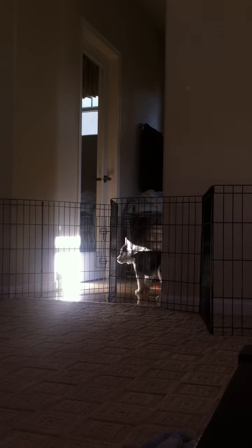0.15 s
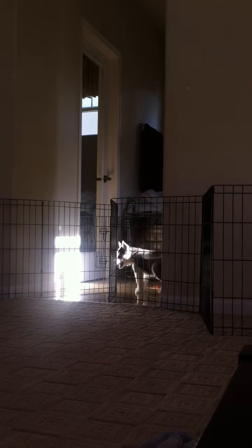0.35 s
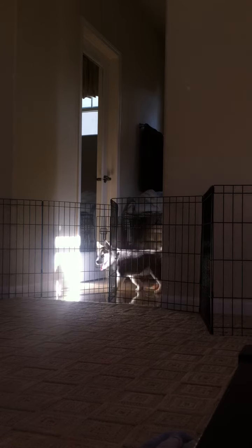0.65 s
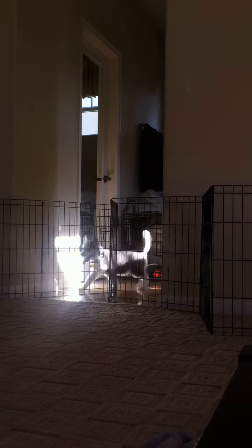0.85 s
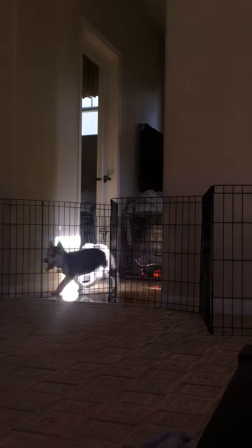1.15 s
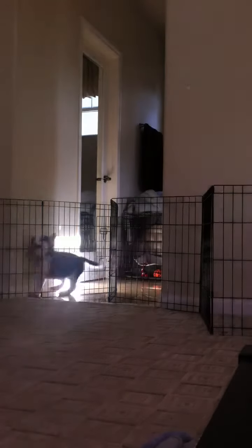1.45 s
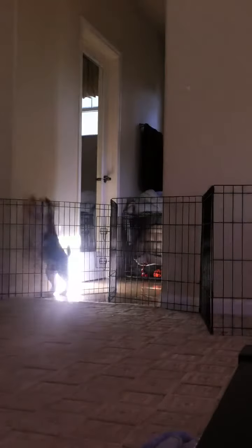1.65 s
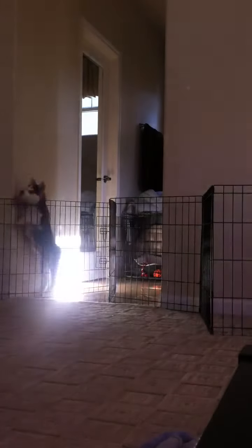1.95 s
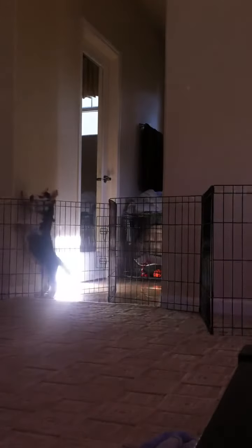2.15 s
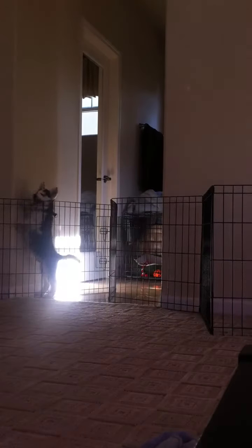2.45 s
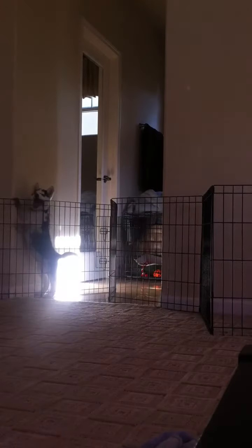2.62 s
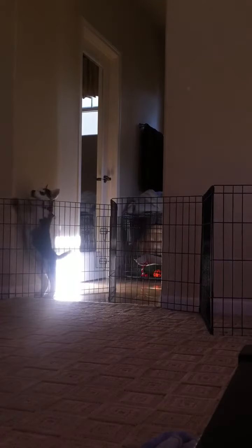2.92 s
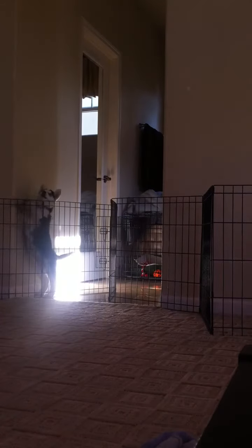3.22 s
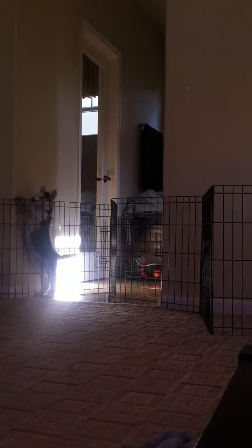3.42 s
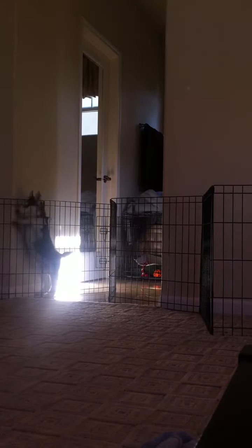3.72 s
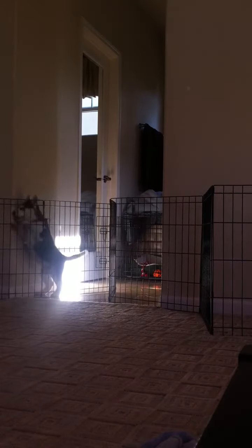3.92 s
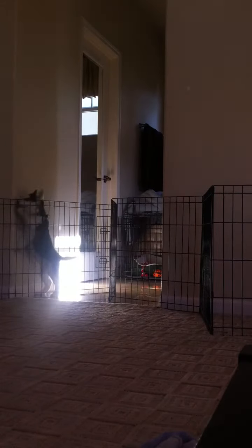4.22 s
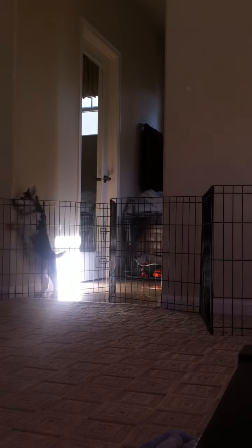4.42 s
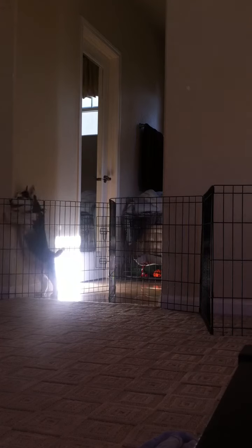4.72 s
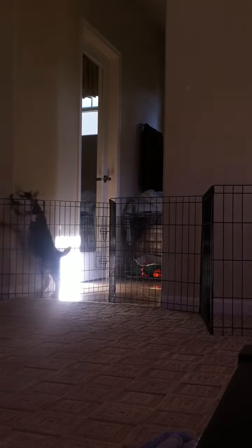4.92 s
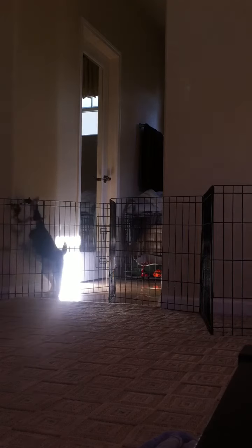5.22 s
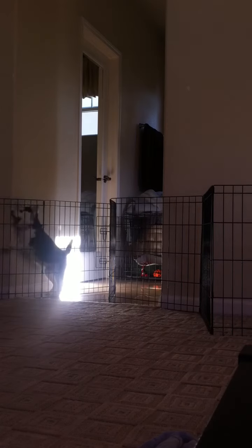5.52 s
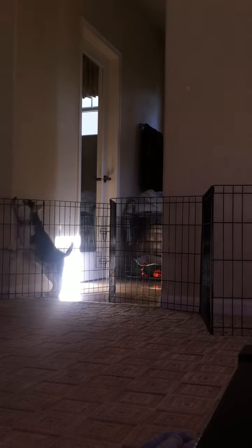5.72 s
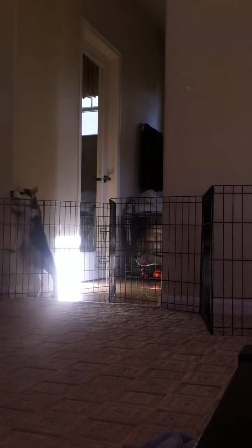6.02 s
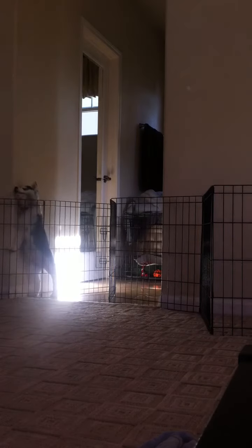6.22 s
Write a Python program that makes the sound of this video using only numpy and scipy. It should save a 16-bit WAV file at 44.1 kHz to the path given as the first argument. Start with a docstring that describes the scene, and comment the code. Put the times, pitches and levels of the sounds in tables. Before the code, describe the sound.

A young dog gives hoarse barks that break into sliding yelps and squeals, while paws thud and claws scrape a pen in an echoing room.

```python
"""Hoarse puppy barks break into high sliding yelps and squeals, with thin nasal whistles on many calls.
Paws thud and claws scrape wire and wall as it jumps up at its pen in a hard, echoing room; a faint hum lies under.
Barks: uneven vocal folds plus a chopped noise jet. Yelps: sliding harmonics plus hiss. Whistles: wavering sines.
Scrapes, thuds and hum: shaped noise. Voice and feet share one room of echoes and diffuse tail."""
import sys
import numpy as np
from scipy import signal
from scipy.fft import rfft, irfft, next_fast_len
from scipy.io import wavfile
from scipy.ndimage import uniform_filter1d, minimum_filter1d

SR = 44100
rng = np.random.default_rng(int(sys.argv[2]) if len(sys.argv) > 2 else 0)


def inscribe(sig):
    """Save sig as 16-bit PCM at rate SR to the path in sys.argv[1].

    A 1-D sig is mono; a 2-D sig holds one channel per row.
    Samples are clipped to [-1, 1] before scaling.
    """
    pcm = np.round(np.clip(np.atleast_2d(sig).T, -1, 1) * 32767)
    wavfile.write(sys.argv[1], SR, pcm.astype(np.int16))


N = 280476  # samples

# Call and foot levels are before VOICE_GAIN_DB, FEET_GAIN_DB and the room.
# Barks. Each row: start in seconds, length in seconds, start pitch in Hz, end pitch in Hz, level in dB,
# roughness (about 0 to 1), mouth resonance in Hz.
BARKS = [(-.03, 0.18, 599.8, 666.3, -18.5, 0.87, 1127), (0.139, 0.076, 637.5, 603.5, -27, 0.31, 1320),
         (.436, 0.12, 441.7, 768, -25.5, 0.61, 1510), (2.636, 0.067, 593, 731, -35.5, 1.06, 1470),
         (2.85, 0.1, 619.6, 708.6, -12.5, 0.59, 1470), (3.374, 0.098, 715.3, 614.6, -30, 0.43, 1110),
         (3.754, 0.097, 424, 594, -38, 0.54, 1180), (4.001, .104, 472, 701, -29.5, 0.46, 1250),
         (4.676, .085, 461, 704, -22, 0.61, 1310), (4.917, .14, 351.2, 742.5, -14, 0.88, 1460),
         (5.619, 0.15, 399.4, 716.7, -15, 0.86, 1164)]
# Drawn-out yelps, one curve each. Each row: time in seconds, pitch in Hz, level in dB, overtone strength in dB.
YELP_CURVES = [
    [(3.06, 1760, -32, -28), (3.09, 1750, -29, -3), (3.115, 1557, -21.5, -0.5), (3.145, 1805, -24, -8.5),
     (3.2, 2208, -32, -4)],
    [(5.085, 1930, -26.5, -23), (5.145, 1570, -25.5, 12), (5.16, 1286, -20, 7.5), (5.204, 1274, -16.5, 8),
     (5.212, 1598, -17.5, 9), (5.24, 1855, -23.5, -6), (5.275, 1930, -23.5, -3), (5.31, 1757, -28, 2),
     (5.318, 1235, -11.5, 1.5), (5.345, 1174, -12.5, -3), (5.385, 1317, -12.5, -7),
     (5.415, 1477, -16.5, -9)],
    [(5.87, 1366, -24.5, -1), (5.92, 1360, -31, 16), (5.94, 1180, -28.5, 7), (5.99, 1159, -16, -8),
     (6.042, 1290, -17.5, -16.5), (6.08, 1159, -17.5, -8), (6.14, 1085, -20, -9.5), (6.18, 1140, -24, 5),
     (6.23, 1115, -23, 1.5), (6.282, 1395, -16.5, -15.5)],
]
# Squeals breaking out of barks and yelps. Each row: start in seconds, length in seconds, pitch in Hz, level in dB.
SQUEALS = [(0.071, 0.107, 1225, -32.5), (2.922, 0.058, 1382, -24), (3.422, 0.0646, 1846, -27.5),
           (3.796, 0.064, 1600, -33), (4.707, 0.032, 1362, -15), (4.999, 0.036, 1406, -14),
           (5.42, 0.0315, 1766, -23), (5.736, 0.043, 1760, -15.5), (6.269, 0.052, 1713, -24)]
# Nasal whistles, mostly as a call ends. Each row: start in seconds, mid pitch in Hz, level in dB.
WHISTLES = [(0.085, 8400, -45.5), (.22, 8800, -53.5), (2.182, 8380, -49.5), (2.961, 8630, -40),
            (3.161, 8630, -38.5), (3.184, 7900, -46), (3.415, 8360, -43), (3.796, 8550, -53.5),
            (4.59, 8300, -58.5), (4.722, 8960, -46), (5.029, 8590, -37), (5.425, 8530, -49.5),
            (5.767, 8740, -40.5), (6.279, 8680, -41)]
# Hardest claw strokes on wire and wall. Each row: start in seconds, length in seconds, level in dB,
# brightness in dB per octave.
SCRAPES = [(1.384, 0.06, -61, 0), (1.677, 0.095, -50, 1), (1.828, 0.055, -49.5, 7), (1.937, 0.11, -58.5, 0),
           (2.09, 0.044, -53, -4), (2.127, 0.16, -50, 7), (2.442, .24, -49.5, -3.5),
           (3.662, 0.047, -56.5, 5), (4.134, 0.1, -57.5, 10.5), (4.292, 0.09, -50, -0.5)]
# Heaviest paw landings on floor and pen. Each row: start in seconds, level in dB, thud pitch in Hz.
PAW_LANDINGS = [(1.76, -44, 253), (1.809, -42, 173), (1.88, -47.5, 286), (2.15, -37.5, 220),
                (2.299, -49.5, 243), (2.438, -41, 186), (2.764, -48.5, 273), (3.285, -45, 205),
                (3.572, -48.5, 340), (4.149, -39.5, 200), (4.215, -44.5, 172), (4.57, -49.5, 500)]
# Throat and muzzle response in barks. Each row: frequency in Hz, gain in dB.
BARK_THROAT = [(150, -31.5), (380, -5), (570, -19), (745, -4.5), (920, -3), (1250, -0.5), (1800, 1.5),
               (2400, -0.5), (2900, -2), (3600, 1), (4500, -3.5), (5800, -34), (9000, -20), (12500, -24),
               (16000, -36.5)]
# Throat and muzzle response in yelps. Each row: frequency in Hz, gain in dB.
YELP_THROAT = [(900, -12.5), (1250, 3.5), (1800, -7.5), (2450, -3.5), (3500, -1.5), (4200, -14),
               (5000, -20.5), (6000, -39), (9500, -41), (15000, -51)]
# Spectrum of scraping claws. Each row: frequency in Hz, relative level in dB per Hz.
CLAW_SPECTRUM = [(30, -28), (200, -0.5), (700, -4.5), (1500, -1), (3000, 2.5), (6000, -1.5), (12000, -5),
                 (16000, -15)]
# Spectrum of the quiet room. Each row: frequency in Hz, relative level in dB per Hz.
HUM_SPECTRUM = [(25, -17.5), (50, -13.5), (80, -11), (125, 2.5), (210, 0.5), (350, -11.5), (700, -11),
                (1500, -17), (3000, -23.5), (6000, -28), (15500, -36.5)]
# Room decay. Each row: frequency in Hz, time to fall 60 dB in seconds.
ROOM_T60 = [(200, 0.22), (1000, 0.45), (3000, 0.51), (8000, 0.5), (15000, 0.19)]
# First echoes from floor and walls. Each row: delay in seconds, level in dB relative to the whole tail.
ECHOES = [(.0013, -9.5), (.0041, -15), (.0073, -10.5), (0.0121, -13), (0.0191, -14.5)]

HUM_DB = -57.5
VOICE_GAIN_DB, FEET_GAIN_DB = 1.0, 2.0
TOP_HZ, PEAK_LIMIT = 15750, 0.72

# a harder bark is brighter
FULL_BARK_DB, FULL_BARK_TILT_DB_PER_OCTAVE, TILT_PER_LEVEL_DB = -15, 0.6, 0.21
BARK_CREST = 0.51  # loudest point, share of length
OPEN_S, MUFFLE_HZ = 0.033, 1390

# the yelping voice roughens as pitch climbs and as air runs out
CLEAN_HZ, CLEAN_DB = 1150, -17
YELP_ROUGH, ROUGH_PER_OCTAVE, ROUGH_PER_LOST_DB = 0.22, 0.4, 0.025

# a squeal slides up to its pitch as it swells, and creeps on upward as it fades
SQUEAL_SCOOP, SQUEAL_CREEP, SQUEAL_CREST = 0.0768, 0.03, 0.447  # shares of pitch, pitch and length
SQUEAL_EDGE_DB, SQUEAL_OVERTONE_DB = -15.5, -15.5

WHISTLE_S, WHISTLE_RISE_HZ = 0.045, 156.5

# light fidgeting against the pen; levels before the random force
FIDGET_START_S, FIDGET_END_S = 2.4, 4.3
STEP_DB, STEP_HZ = -56.5, 260
RAKE_S, RAKE_DB, RAKE_TILT_DB_PER_OCTAVE = 0.17, -68.5, 5


def undb(db):
    """Decibels to gain."""
    return 10 ** (np.asarray(db) / 20)


def unit(x):
    """Scale to rms 1."""
    return x / np.sqrt(np.mean(x ** 2) + 1e-18)


def on_log(hz, points):
    """Read (Hz, value) points on a log-frequency axis."""
    f, value = np.transpose(points)
    return np.interp(np.log(hz + 1), np.log(f), value)


def colour(x, db_at):
    """Filter by a gain in dB that is a function of frequency."""
    size = next_fast_len(len(x) + 2048)
    hz = np.maximum(np.fft.rfftfreq(size, 1 / SR), 1)
    return irfft(rfft(x, size) * undb(db_at(hz)), size)[:len(x)]


def tilt(f, db_per_octave, pivot_hz):
    """A spectral slope, flat below 200 Hz."""
    return db_per_octave * np.log2(np.maximum(f, 200) / pivot_hz)


def wander(count, rate_hz):
    """Random motion: straight lines between normal draws made rate_hz times a second."""
    knots = rng.standard_normal(8192)
    return np.interp(np.arange(count) / SR * rate_hz, np.arange(len(knots)), knots)


def progress(length_s):
    """Run from 0 to 1 over the length, in at least 64 samples."""
    return np.linspace(0, 1, max(int(length_s * SR), 64))


def add(track, start_s, sound):
    """Mix a sound in, trimming whatever falls outside the track."""
    start = int(start_s * SR)
    sound, start = sound[max(-start, 0):], max(start, 0)
    track[start:start + len(sound)] += sound[:max(N - start, 0)]


def room_hum():
    """Low-weighted noise with a slightly unsteady level."""
    noise = unit(colour(rng.standard_normal(N), lambda f: on_log(f, HUM_SPECTRUM)))
    return noise * undb(HUM_DB + 0.73 * wander(N, 18))


def bark(length_s, crest, start_hz, end_hz, rough, mouth_hz, tilt_db, jitter=0.1035, chaos=0.1472,
         shimmer=0.73, upper_db=1, rasp_db=1, rasp_hz=1200, mouth_db=7, mouth_width_hz=130, fall=0.49):
    """One push of air: the pitch slides while the folds beat unevenly and chop a turbulent jet."""
    u = progress(length_s)
    count = len(u)
    crest = np.clip(crest, 0.1, 0.9)
    push = np.sin(np.pi * np.interp(u, [0, crest, 1], [0, 0.5, 1])).clip(0)
    # roughness grows with pressure
    strain = rough * push ** 0.16
    pitch_hz = end_hz + (start_hz - end_hz) * (1 - u) ** 2.2
    phase = 2 * np.pi * np.cumsum(pitch_hz * (1 + jitter * strain * wander(count, 501))) / SR
    # the bulk of the folds swings more steadily than their slapping edges
    swing = np.sin(phase) + np.sin(2 * phase)
    edge_phase = phase + 2 * np.pi * np.cumsum(pitch_hz * chaos * rough * wander(count, 600)) / SR
    slaps = unit(sum(np.sin(k * edge_phase) / k ** fall for k in range(3, 13)))
    slaps *= 1 + shimmer * wander(count, 453.9)

    def jet_db(f):
        return -10 * np.log10((1 + (rasp_hz / f) ** 2) * (1 + (f / 9000) ** 2))

    def mouth_response_db(f):
        resonance_db = mouth_db / (1 + ((f - mouth_hz) / mouth_width_hz) ** 2)
        return on_log(f, BARK_THROAT) + tilt(f, tilt_db, mouth_hz) + resonance_db

    chopped = rng.standard_normal(count) * (1 + 0.28 * np.cos(edge_phase))
    rasp = undb(rasp_db) * strain * unit(colour(chopped, jet_db))
    source = swing + undb(upper_db) * push ** 0.4 * slaps + rasp
    source *= undb(5.4 * wander(count, 222.4))
    voice = colour(source, mouth_response_db)
    # the push sets the slow loudness; only quick flutter survives the levelling
    level = np.sqrt(uniform_filter1d(voice ** 2, size=900) + 1e-12)
    return voice / level * push ** 1.22


def opening(voice):
    """The mouth opens as a bark starts, so the treble arrives late."""
    closed = colour(voice, lambda f: -10 * np.log10(1 + (f / MUFFLE_HZ) ** 4))
    gape = np.minimum(np.arange(len(voice)) / SR / OPEN_S, 1)
    return closed + gape * (voice - closed)


def yelp(curve, jitter=0.025, waver=0.01314, hiss_db=-17, flutter_db=4):
    """Tight folds sing a sliding stack of harmonics; strain makes it shake and hiss."""
    knot_s, *columns = np.transpose(curve)
    t = np.arange(knot_s[0], knot_s[-1], 1 / SR)
    count = len(t)
    hz, db, overtone_db = (np.interp(t, knot_s, column) for column in columns)
    climb = ROUGH_PER_OCTAVE * np.log2(hz / CLEAN_HZ)
    lost_air = ROUGH_PER_LOST_DB * (CLEAN_DB - db)
    rough = np.clip(YELP_ROUGH + climb + lost_air, 0, 1)
    hz = hz * (1 + jitter * rough * wander(count, 600) + waver * wander(count, 111.27))
    phase = 2 * np.pi * np.cumsum(hz) / SR
    # the folds close unevenly, so each overtone flutters
    gains = []
    for k in range(1, 13):
        flutter = overtone_db + flutter_db * wander(count, 141.2)
        gain_db = on_log(k * hz, YELP_THROAT) + flutter * (k > 1)
        gains.append(undb(gain_db) * (k * hz < TOP_HZ))
    tone = sum(g * np.sin(k * phase) for k, g in enumerate(gains, 1))
    tone /= np.sqrt(sum(g ** 2 for g in gains) / 2)
    air = unit(colour(rng.standard_normal(count), lambda f: on_log(f, BARK_THROAT)))
    return (tone + undb(hiss_db) * rough * air) * undb(db) * signal.windows.tukey(count, 0.07)


def squeal_curve(start_s, length_s, hz, db):
    """A brief arch of the yelping voice, with the columns of a yelp curve."""
    crest_s = start_s + length_s * np.clip(SQUEAL_CREST, 0.1, 0.9)
    edge_db = db + SQUEAL_EDGE_DB
    return [(start_s, hz * (1 - SQUEAL_SCOOP), edge_db, SQUEAL_OVERTONE_DB),
            (crest_s, hz, db, SQUEAL_OVERTONE_DB),
            (start_s + length_s, hz * (1 + SQUEAL_CREEP), edge_db, SQUEAL_OVERTONE_DB)]


def whistle(length_s, start_hz, end_hz, waver=0.013, air_db=-12):
    """A thin, unsteady squeak through the nose, with a fringe of hiss."""
    u = progress(length_s)
    hz = (start_hz + (end_hz - start_hz) * u) * (1 + waver * wander(len(u), 250))
    tone = unit(np.sin(2 * np.pi * np.cumsum(hz) / SR))
    air = unit(colour(rng.standard_normal(len(u)), lambda f: -16 * np.abs(np.log2(f / 11000))))
    return (tone + undb(air_db) * air) * np.sin(np.pi * u).clip(0) ** 0.19


def calls():
    """Barks coloured by their effort, yelps, squeals and nasal whistles."""
    dog = np.zeros(N)
    for start_s, length_s, start_hz, end_hz, db, rough, mouth_hz in BARKS:
        tilt_db = FULL_BARK_TILT_DB_PER_OCTAVE + TILT_PER_LEVEL_DB * (db - FULL_BARK_DB)
        voice = bark(length_s, BARK_CREST, start_hz, end_hz, rough, mouth_hz, tilt_db)
        add(dog, start_s, undb(db) * opening(voice))
    for curve in YELP_CURVES + [squeal_curve(*row) for row in SQUEALS]:
        add(dog, curve[0][0], yelp(curve))
    for start_s, hz, db in WHISTLES:
        sound = whistle(WHISTLE_S, hz - WHISTLE_RISE_HZ / 2, hz + WHISTLE_RISE_HZ / 2)
        add(dog, start_s, undb(db) * sound)
    return dog


def scrape(length_s, tilt_db, grain_db=5, catch_db=4):
    """A claw catches and slips: a dense run of uneven ticks that dies away."""
    u = progress(length_s)
    roughness_db = grain_db * rng.standard_normal(len(u)) + catch_db * wander(len(u), 180)
    ticks = rng.standard_normal(len(u)) * undb(roughness_db)
    pressure = np.minimum(u / 0.064, 1) * (1 - u) ** 0.46
    return unit(colour(ticks * pressure, lambda f: on_log(f, CLAW_SPECTRUM) + tilt(f, tilt_db, 3000)))


def paw(hz, decay_s=0.054, slope_db=8):
    """A soft blow: a short, dull thud of decaying noise around one pitch."""
    t = np.arange(SR // 5) / SR

    def body_db(f):
        return -slope_db * np.abs(np.log2(f / hz)) - 10 * np.log10(1 + (110 / f) ** 6)

    return unit(colour(rng.standard_normal(len(t)), body_db)) * np.exp(-t / decay_s)


def scrabbling(count=9, scatter_db=2):
    """Hard scrapes and landings, plus light, unevenly spaced steps that each start a short rake."""
    feet = np.zeros(N)
    for start_s, length_s, db, tilt_db in SCRAPES:
        add(feet, start_s, undb(db) * scrape(length_s, tilt_db))
    for start_s, db, hz in PAW_LANDINGS:
        add(feet, start_s, undb(db) * paw(hz))
    for k, (late, force) in enumerate(rng.random((count, 2))):
        start_s = np.interp(k + late, [0, count], [FIDGET_START_S, FIDGET_END_S])
        gain = undb(scatter_db * (2 * force + 0.5))
        add(feet, start_s, gain * undb(STEP_DB) * paw(STEP_HZ))
        add(feet, start_s, gain * undb(RAKE_DB) * scrape(RAKE_S, RAKE_TILT_DB_PER_OCTAVE))
    return feet


def room(x, direct_db=-2.0, build_s=0.0011):
    """Direct sound, a few hard echoes from floor and walls, and a diffuse tail decaying by band."""
    t = np.arange(SR) / SR
    spectrum, f = rfft(rng.standard_normal(SR)), np.fft.rfftfreq(SR, 1 / SR)
    centres_hz = np.geomspace(125, 16000, 8)
    tail = np.zeros(SR)
    for hz in centres_hz:
        # overlapping triangular bands on a log axis
        weight = on_log(f, np.c_[centres_hz, centres_hz == hz])
        tail += irfft(spectrum * weight, SR) * np.exp(-np.log(1000) * t / on_log(hz, ROOM_T60))
    tail *= 1 - np.exp(-t / build_s)
    response = tail / np.linalg.norm(tail)
    response[0] += undb(direct_db)
    for delay_s, db in ECHOES:
        response[int(delay_s * SR)] += undb(db)
    return signal.fftconvolve(x, response / np.linalg.norm(response))[:N]


def scene():
    """Voice and feet share the room; the hum lies under them."""
    puppy = undb(VOICE_GAIN_DB) * calls() + undb(FEET_GAIN_DB) * scrabbling()
    return (room(puppy) + room_hum())[None]


def record(dry, bass_hz=95):
    """Thin the deep bass, limit the loudest peaks with a smoothed gain, and cut the top steeply."""
    thin = signal.sosfilt(signal.butter(2, bass_hz, "high", fs=SR, output="sos"), dry)
    peak_gain = PEAK_LIMIT / np.maximum(np.abs(thin), PEAK_LIMIT)
    gain = uniform_filter1d(minimum_filter1d(peak_gain, size=100), size=100)
    top_cut = signal.ellip(10, 0.2, 80, TOP_HZ, fs=SR, output="sos")
    return signal.sosfilt(top_cut, thin * gain)


dry = scene()
out = record(dry)
inscribe(out)
```